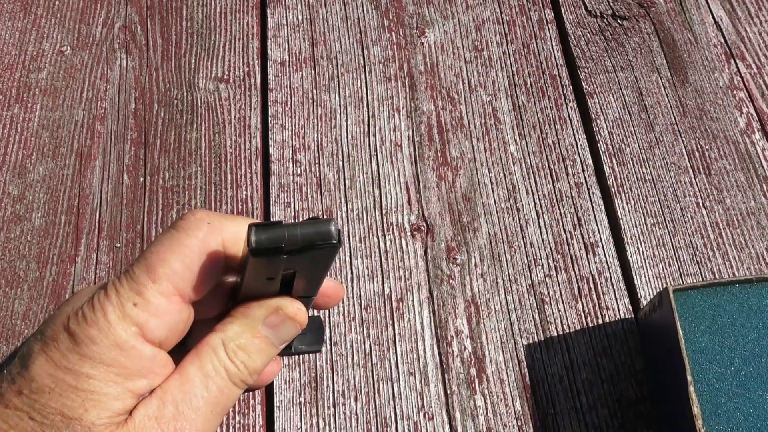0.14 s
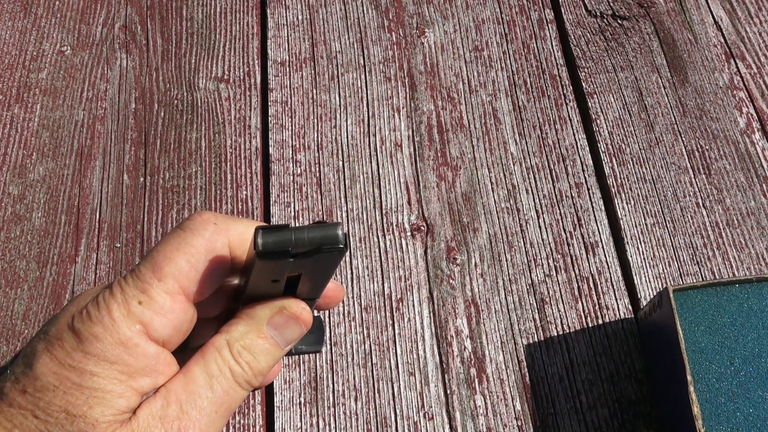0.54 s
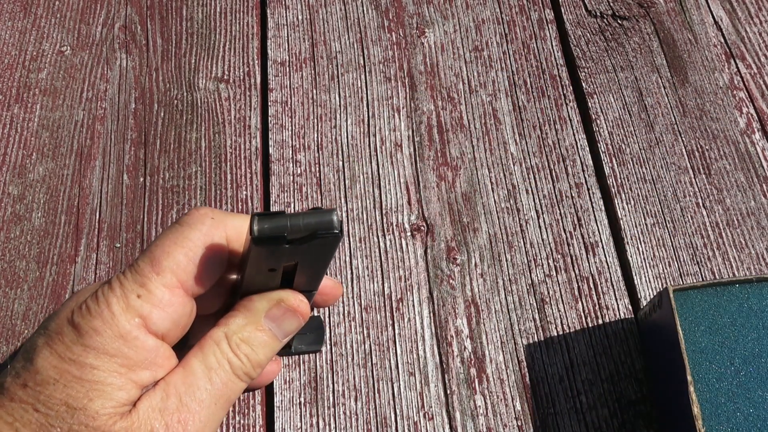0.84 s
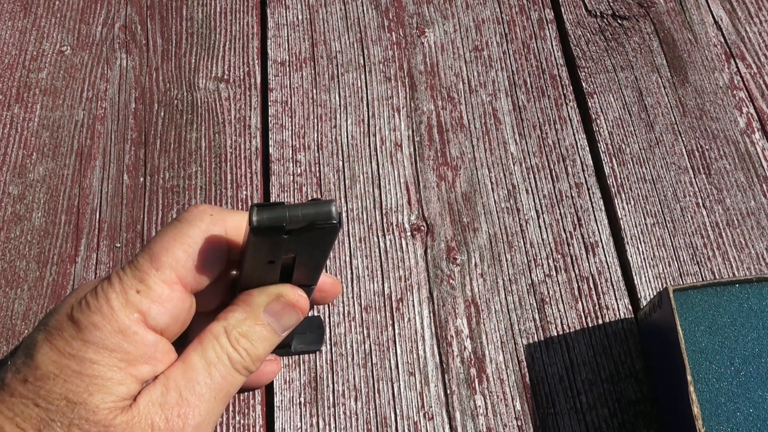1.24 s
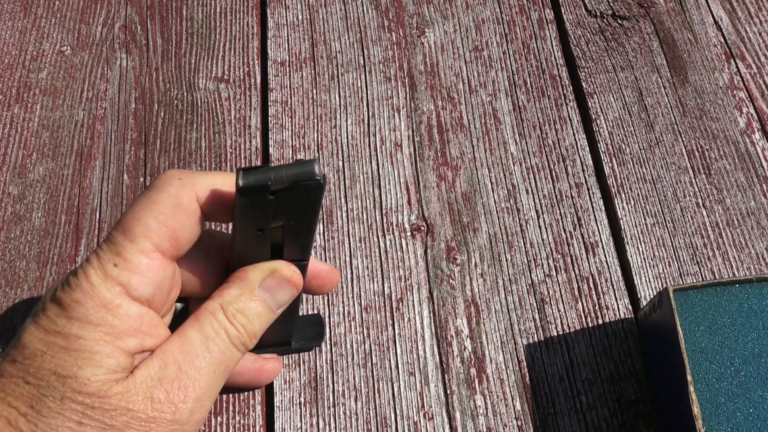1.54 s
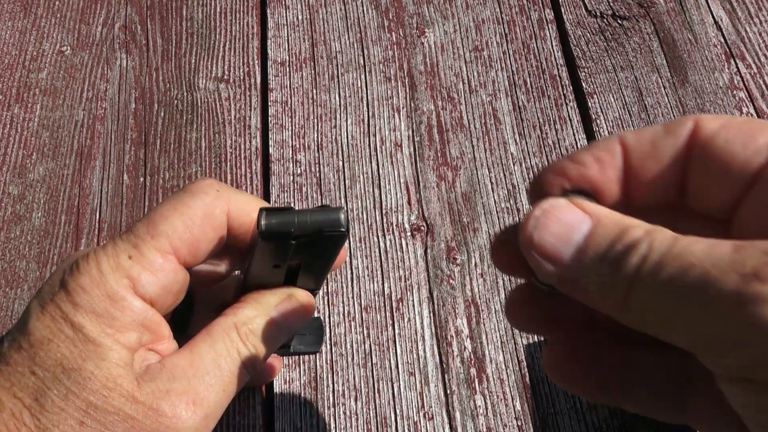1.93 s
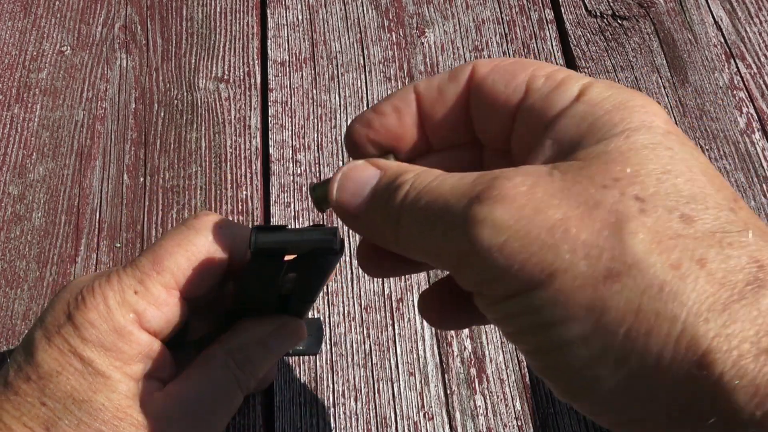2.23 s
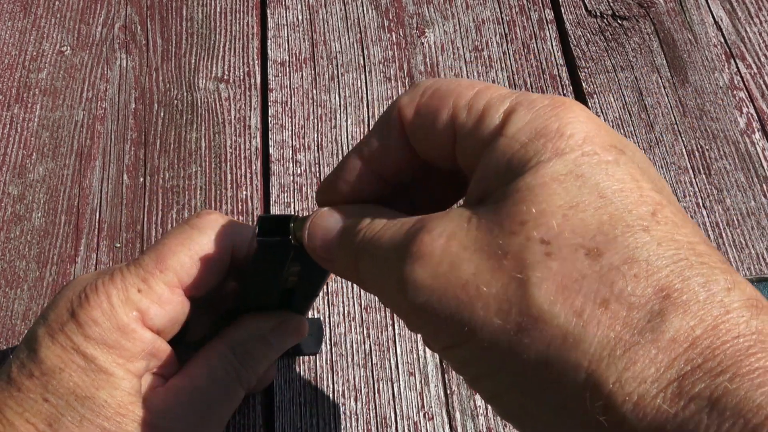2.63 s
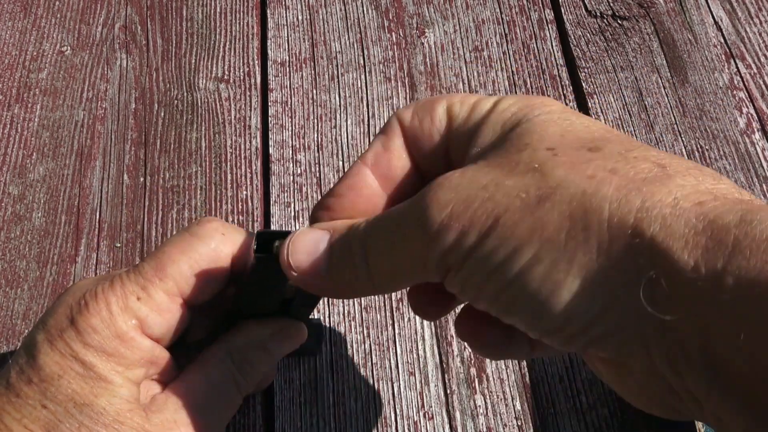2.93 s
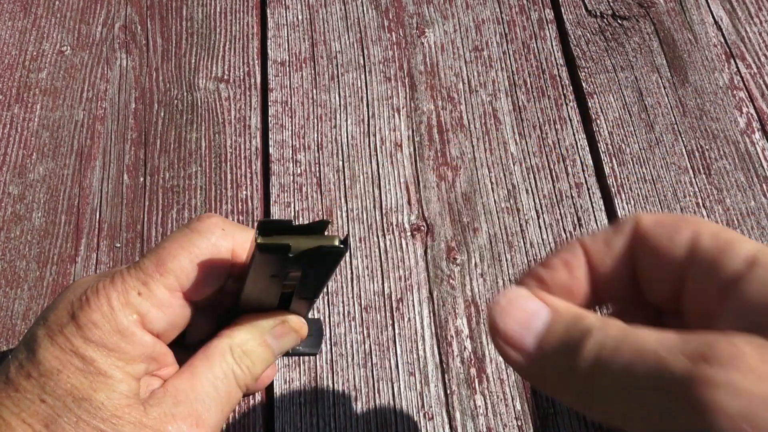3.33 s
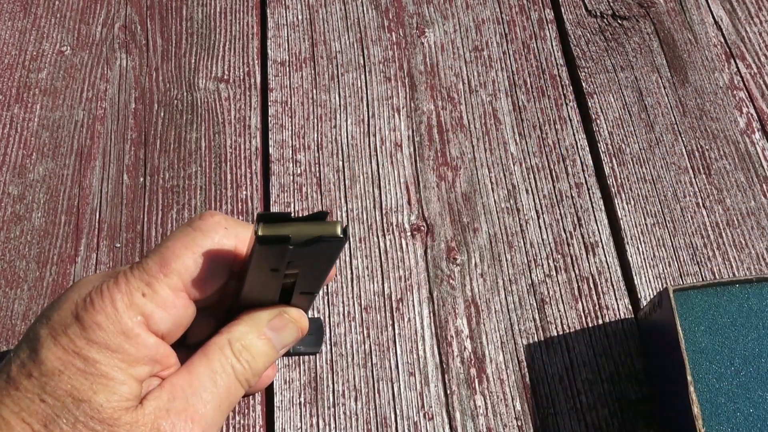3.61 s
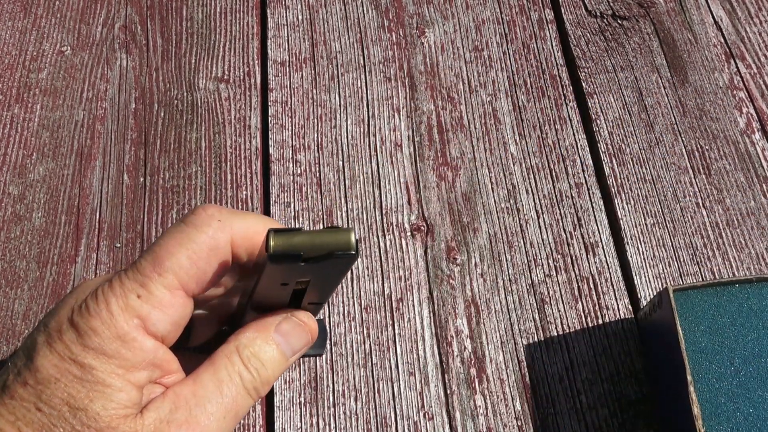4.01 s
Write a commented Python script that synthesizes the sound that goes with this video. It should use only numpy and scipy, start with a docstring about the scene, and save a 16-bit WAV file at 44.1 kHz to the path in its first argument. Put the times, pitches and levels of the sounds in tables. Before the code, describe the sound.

Near the microphone, loose rounds slide and thud in a small box on planks for about a second. Quiet follows, then tiny brass ticks, a dense burst of bright metal clicks and smaller clusters as the round is pressed home. A final snap precedes more box knocking. Steady hum, faint insects and slight low wind lie underneath; dry, open air.

```python
"""A hand rummages in a cartridge box on a plank bench outdoors, fingers a round, presses it under the steel
lips of a pistol magazine and reaches for the next. Sliding and knocking ring the box, the brass and the steel,
each built from a list of ringing pitches. The bench booms at each push as a low, nearly pure tone.
Behind it a motor hums in harmonics, insects sing in throbbing noise bands, and wind and air are shaped noise."""
import sys
import numpy as np
from scipy import signal
from scipy.fft import rfft, irfft
from scipy.io import wavfile
from scipy.ndimage import uniform_filter1d

SR = 44100
rng = np.random.default_rng(int(sys.argv[2]) if len(sys.argv) > 2 else 0)


def to_wav(s):
    """Save 16-bit WAV."""
    ch = np.atleast_2d(s).T  # columns
    pcm = np.round(np.clip(ch, -1, 1) * 32767)  # PCM
    wavfile.write(sys.argv[1], SR, pcm.astype(np.int16))


N = 183544  # length in samples


def amp(db):
    """Turn dB into gain."""
    return 10 ** (np.asarray(db) / 20)


def rms_one(x):
    """Scale to an rms level of 1."""
    return x / np.sqrt(np.mean(x ** 2) + 1e-20)


def in_time(rows):
    """Gain over time, along straight lines between points in dB."""
    s, db = np.transpose(rows)
    return amp(np.interp(np.arange(N) / SR, s, db))


def drift(rate):
    """Smooth random wandering of spread 1; a higher rate in Hz wanders faster."""
    r = np.exp(-80 * np.pi * rate / SR)  # made at every 40th sample
    noise = rng.standard_normal(N // 40 + 2002)
    slow = signal.lfilter([1], [1, -2 * r, r * r], noise)[2000:]  # skip the filter's start
    return np.interp(np.arange(N) / 40, np.arange(len(slow)), rms_one(slow))


def ring(x, hz, t60):
    """One resonance: a unit click sets a sine ringing, which falls 60 dB in t60 seconds."""
    r = amp(-60 / (t60 * SR))
    w = 2 * np.pi * hz / SR
    return signal.lfilter([0, np.sin(w)], [1, -2 * r * np.cos(w), r * r], x + 1e-18)


def grains(per_s, spread_db):
    """Rubbing as tiny slips at random moments, uneven in size and direction."""
    sizes = amp(spread_db * np.minimum(rng.exponential(1, N), 4))
    signs = rng.choice([-1, 1], N)
    return sizes * signs * (rng.random(N) < per_s / SR)


def rubbed(modes, tilt_db, pivot_hz, per_s, spread_db, patchy_db):
    """Random slips ring each mode of a body, with wandering loudness; the sum has rms 1."""
    out = 0
    for hz, db, t60 in modes:
        mode_db = db + tilt_db * np.log2(hz / pivot_hz) + patchy_db * drift(36)
        out = out + amp(mode_db) * ring(grains(per_s, spread_db), hz, t60)
    return rms_one(out)


def blow(hz, db, t60, centre_hz, focus_db, contact_s, luck):
    """A rough contact rings every mode; a positive focus favours those near the struck pitch."""
    t = np.arange(2000)[:, None] / SR
    uneven_db = 2.5 * luck[:len(hz)]
    gains = amp(db - focus_db * np.abs(np.log2(hz / centre_hz)) + uneven_db)
    modes = np.sum(gains * np.sin(2 * np.pi * hz * t) * amp(-60 * t / t60), axis=1)
    x = np.arange(len(luck) - 40) / (contact_s * SR)
    force = luck[40:] * np.sqrt(x + 0.0061) * np.exp(-x)  # noisy force builds, then lets go
    return np.convolve(force, modes)


def add(out, s, db, sound):
    """Lay one sound in at its time and peak level."""
    i = int(s * SR)
    out[i:i + len(sound)] += (amp(db) * sound / np.max(np.abs(sound)))[:N - i]


def strokes(rows, rise_db_per_s, fall_db_per_s):
    """Each row swells, holds and fades; gives that shape as gain, and the loudest row's other columns."""
    start_s, held_s, *columns = np.transpose(rows)
    t = np.arange(0, N + 40, 40) / SR
    early = np.maximum(start_s[:, None] - t, 0)
    late = np.maximum(t - (start_s + held_s)[:, None], 0)
    row_db = columns[0][:, None] - rise_db_per_s * early - fall_db_per_s * late
    lead = np.argmax(row_db, axis=0)
    level_db = np.max(row_db, axis=0)
    rest = [uniform_filter1d(c[lead], size=9) for c in columns]  # soften jumps between rows
    curves = [level_db - rest[0], *rest]
    shape_db, *rest = [np.interp(np.arange(N) / SR, t, c) for c in curves]
    return amp(shape_db), *rest


# How the box rings on the wood. Each row: pitch in Hz, relative level in dB, time to fall 60 dB in seconds.
BOX_MODES = [(278, -9.5, 0.04), (390, -3, 0.0073), (504.6, 1, 0.021), (624, -6, 0.021), (942, -3, 0.0091),
             (1168, -13, 0.015), (1466, -16.5, 0.0075), (1564, -13.5, 0.017), (1806, -5.5, 0.0081),
             (2350, -6.5, 0.0028), (2676, -5.5, 0.0092), (3120, -5.5, 0.0017), (3590, -9, 0.0042),
             (4270, -6, 0.0035), (5560, -16, 0.013), (7360, -16, 0.0072), (8860, -19, .005),
             (10300, -3, 0.0044)]
# The hand sweeps among the rounds in the box. Each row: start of the hold in seconds, hold in seconds,
# rms level in dB, brightness in dB per octave.
SWEEPS_IN_BOX = [(.474, 0.079, -39.5, 3), (.54, 0.016, -32, 0.2), (.62, 0.12, -48, -4.5),
                 (.726, 0.037, -29, 1.5), (.78, 0.033, -31, -1.5), (.851, 0.027, -23, -0.4),
                 (.884, .045, -23, 2.3), (.935, 0.046, -26, -0.9), (1.0, 0.056, -35, 0.5),
                 (1.105, 0.029, -25.5, 1.3), (1.16, .02, -35.5, -3), (1.2, 0.041, -45.5, -2),
                 (1.315, 0.04, -49.5, -4.5), (3.5, .2, -55.5, -7.5), (3.752, 0.0111, -36, -4),
                 (3.79, .03, -43.5, 1), (3.86, 0.076, -47.5, -0.5), (3.93, 0.061, -42.5, 0.5),
                 (4.02, .03, -47.5, -4), (4.054, 0.012, -23, 1), (4.086, 0.006, -27.5, -1)]
SWEEP_RISE_DB_PER_S, SWEEP_FALL_DB_PER_S = 3000, 256
# Dull knocks through box and planks. Each row: start in seconds, peak level in dB, favoured pitch in Hz,
# focus on that pitch in dB per octave.
BOX_KNOCKS = [(0.472, -28, 500, 25), (.478, -27, 894, 2), (0.5, -29.5, 845, 13), (0.551, -27.5, 1040, 5),
              (0.699, -33, 1070, 6), (.733, -13.5, 1560, 8.5), (0.756, -16.5, 1544, 5.5),
              (0.791, -15.5, 969, -2), (.812, -30, 1090, 19), (.851, -37, 1817, 2.5), (.869, -41, 1350, 8),
              (.884, -14.5, 1220, 3.5), (.904, -21.5, 802, 16), (.924, -25, 916, 25),
              (.951, -11.5, 802, -2.5), (.977, -17.5, 1700, 8.5), (1.006, -29.5, 1760, 10),
              (1.034, -26, 1692, 11), (1.105, -25, 1760, 0.5), (1.121, -14.5, 800, 3),
              (1.142, -23, 1728, 11), (1.164, -20.5, 1790, 12), (1.186, -29, 810, -2),
              (1.199, -38, 1030, 9), (1.215, -28, 832, 1), (1.243, -36, 805, 0), (1.31, -30, 1831, -1.5),
              (1.35, -39, 1800, 4), (2.638, -37, 516, 14), (2.911, -21.5, 1483, 32), (2.987, -30, 2000, 2),
              (3.186, -36.5, 902, 4), (3.751, -30, 700, 3), (3.792, -36.5, 1003, 4), (3.962, -39, 1940, -2),
              (4.054, -18, 1074, 20), (4.065, -14.5, 2407, 31), (4.089, -10, 970, 9),
              (4.102, -17.5, 1450, 10), (4.136, -40, 2600, -6)]
KNOCK_CONTACT_S = 0.0026  # time scale of the letting go


def box():
    """Rounds sliding and knocking in the box ring its walls."""
    shape, level_db, tilt_db = strokes(SWEEPS_IN_BOX, SWEEP_RISE_DB_PER_S, SWEEP_FALL_DB_PER_S)
    sliding = rubbed(BOX_MODES, tilt_db, 1120, per_s=2000, spread_db=4.5, patchy_db=3.5)
    out = shape * amp(level_db) * sliding
    hz, db, t60 = np.transpose(BOX_MODES)
    lucks = rng.standard_normal((len(BOX_KNOCKS), 1200))
    for (s, peak_db, centre_hz, focus_db), luck in zip(BOX_KNOCKS, lucks):
        add(out, s, peak_db, blow(hz, db, t60, centre_hz, focus_db, KNOCK_CONTACT_S, luck))
    return out


# How the brass case rings. Each row: pitch in Hz, relative level in dB, time to fall 60 dB in seconds.
CASE_MODES = [(2010, -10.5, 0.016), (2860, -5, 0.018), (3334, 1.5, 0.02), (3770, -1, 0.024),
              (4446, -5, 0.015), (5400, -6, 0.02), (6540, -7, 0.019), (7030, 0, 0.026), (7800, 1.5, 0.0042),
              (8560, -4.5, 0.026), (9770, -0.5, 0.013)]
# How the magazine's hollow body rings. Each row: pitch in Hz, relative level in dB, time to fall 60 dB in seconds.
HOLLOW_MODES = [(382, 3.5, 0.047), (504, 3.5, 0.014), (634, -0.5, 0.039), (847, -4.5, 0.071),
                (987, -7.5, 0.034)]
# A round turned between the fingers. Each row: start of the hold in seconds, hold in seconds, case rms level in dB,
# case brightness in dB per octave, hollow body rms level in dB, spring rms level in dB.
FINGER_TURNS = [(1.888, .012, -49.5, -5, -52.5, -53.5), (1.96, .03, -49.5, -2, -55, -49),
                (1.995, 0.061, -41.5, 0, -44.5, -48.5), (2.075, 0.01, -46.5, -1, -46, -47),
                (2.11, 0.024, -47.5, -2, -47, -43), (2.138, 0.0069, -35.5, 5.5, -44, -33),
                (2.155, 0.047, -40, 1, -44.5, -35.5), (2.232, 0.03, -39, 3, -46.5, -38.5),
                (2.28, 0.032, -52, -7, -50, -47), (2.32, 0.052, -59, -0.5, -59, -52)]
TURN_RISE_DB_PER_S, TURN_FALL_DB_PER_S = 900, 398
SPRING_HZ, SPRING_T60_S = 474, 0.16


def fingers():
    """The case rings faintly as it rolls; the grip rubs the hollow magazine and sets its spring humming."""
    turns = strokes(FINGER_TURNS, TURN_RISE_DB_PER_S, TURN_FALL_DB_PER_S)
    shape, case_db, tilt_db, body_db, spring_db = turns
    case = rubbed(CASE_MODES, tilt_db, 4400, per_s=7600, spread_db=1.0, patchy_db=5.0)
    body = rubbed(HOLLOW_MODES, 0, 500, per_s=1400, spread_db=1.5, patchy_db=-1.5)
    spring = rms_one(ring(rng.standard_normal(N), SPRING_HZ, SPRING_T60_S))
    return shape * (amp(case_db) * case + amp(body_db) * body + amp(spring_db) * spring)


TAIL_DB, TAIL_T60_S = -7, 0.028


def scattered(x):
    """Scatter off hands and planks gives each click a brief, noisy tail."""
    tail = rng.standard_normal(3000) * amp(-60 * np.arange(3000) / SR / TAIL_T60_S)
    tail = tail / np.linalg.norm(tail)
    return x + amp(TAIL_DB) * signal.fftconvolve(x, tail)[:N]


# How the hand-damped steel rings. Each row: pitch in Hz, relative level in dB.
STEEL_MODES = [(1710, -47), (2150, -13.5), (2780, -21), (3350, -35), (3910, -4.5), (4410, 9), (4940, 11.5),
               (5400, 11), (5820, 3.5), (6380, 11), (7240, 12.5), (7700, 9), (8200, 9.5), (8800, -21),
               (9340, -6.5), (9900, 28.5)]
# Brass sliding under the lips. Each row: start of the hold in seconds, hold in seconds, metal rms level in dB
# (before bass cut and scatter), metal brightness in dB per octave, wooden body rms level in dB.
LIP_SLIDES = [(2.372, 0.017, -50, -3, -41), (2.395, 0.03, -41.5, 3, -27), (2.425, 0.009, -44.5, 2, -34.5),
              (2.445, 0.0045, -42, 2, -29.5), (2.455, 0.035, -38.5, -17, -41.5),
              (2.697, 0.009, -31.5, -15.5, -39.5), (2.897, .01, -46, -7.5, -48),
              (2.911, 0.012, -30.5, -16, -34.5), (2.945, .035, -51, -5, -54),
              (2.989, 0.018, -40, -3, -33.5), (3.02, 0.011, -38, -11.5, -31.5),
              (3.045, 0.019, -49, -6.5, -44.5), (3.18, 0.019, -52.5, -22, -51),
              (3.27, 0.02074, -57, -15, -70), (3.472, .008, -59, -4, -65), (3.565, 0.032, -49, 2, -64),
              (3.635, .015, -44, -4.5, -48.5), (3.652, 0.011, -42.5, -8, -41.5),
              (3.682, .015, -56, 0.5, -55)]
SLIDE_RISE_DB_PER_S, SLIDE_FALL_DB_PER_S = 4004, 446
# Brass clicking on steel. Each row: start in seconds, peak level in dB (before bass cut and scatter),
# favoured pitch in Hz, focus on that pitch in dB per octave.
STEEL_CLICKS = [(1.873, -40, 3440, 21), (1.889, -28, 3660, 10), (1.9962, -30, 3660, 1),
                (2.0057, -30, 3710, 8), (2.0344, -19, 6760, 28), (2.073, -32, 3650, 15),
                (2.1099, -23.5, 6750, -1), (2.1208, -40, 3250, 16), (2.137, -19.5, 7200, 27),
                (2.1987, -23, 7970, 13), (2.211, -30, 3250, 1), (2.2316, -14.5, 9860, 9),
                (2.2508, -18, 8020, 12), (2.2814, -27, 4690, 21), (2.3018, -20, 4040, 29),
                (2.3884, -17, 4400, 17), (2.3964, -3.5, 5830, 25), (2.401, -9, 8170, -5),
                (2.4057, -16, 5850, 9), (2.408, -9, 7500, 21), (2.412, -3.5, 6340, 27),
                (2.4188, -15.5, 4400, 19), (2.4263, -8, 4470, 8), (2.4337, -13, 4120, 18),
                (2.4453, 0, 5260, 10), (2.4597, -23, 5020, 15), (2.471, -19, 4990, 1),
                (2.5428, -31.5, 4270, 17), (2.6335, -39, 4170, 18), (2.676, -33, 4574, 16),
                (2.6986, -11.5, 7100, 30), (2.7122, -23.5, 4476, 18), (2.7582, -35.5, 7240, 33),
                (2.794, -33, 4670, 24), (2.8962, -18.5, 6470, 38), (2.9092, -22.5, 6430, 25),
                (2.918, -16, 6490, 25), (2.9284, -12.5, 6600, 22), (2.9314, -17, 5500, 15),
                (2.966, -27, 4040, 17), (2.9786, -29, 4220, 20), (2.9891, -8, 4230, 2),
                (2.993, -7, 9260, 5), (2.996, -11, 9300, 15), (2.9987, -25, 5500, 16),
                (3.0091, -18, 9590, 7), (3.0131, -17, 4710, 15), (3.0173, -15, 4030, 9),
                (3.0281, -18, 4260, 24), (3.0457, -25.5, 4070, 19), (3.0613, -31, 4900, 19),
                (3.115, -37.5, 4240, 13), (3.222, -34.5, 4227, 17), (3.475, -28, 7390, 6),
                (3.5662, -24.5, 7590, 31), (3.5972, -35.5, 4540, 16), (3.6359, -18.5, 9620, 18),
                (3.6445, -18, 9520, 18), (3.65, -32, 4120, -3), (3.656, -14.5, 5574, 11),
                (3.6616, -2.5, 8550, 48), (3.688, -30, 4950, 22)]
CLICK_T60_S, CLICK_CONTACT_S = 0.006, 0.00083
# Touches that leave a loosely held magazine wall ringing. Each row: start in seconds,
# peak level in dB (before bass cut and scatter).
WALL_PINGS = [(1.8921, -60), (2.0368, -45), (2.2824, -45), (2.9886, -36), (3.1914, -56), (3.2271, -58),
              (3.2714, -58.5), (3.4755, -57), (3.5658, -58)]
WALL_HZ, WALL_T60_S = 2066, 0.092
# A round dropped on the lips chatters to rest: first tap, first gap, share of the gap kept each time.
BOUNCE_S, BOUNCE_GAP_S, BOUNCE_KEEP = 2.3708, 0.0033, 0.74
BOUNCE_DB, BOUNCE_LOSS_DB = -4.5, 3  # first peak before bass cut and scatter, loss per tap


def magazine():
    """Brass slides, clicks and bounces on the steel lips, and pushes travel down into the wood."""
    slides = strokes(LIP_SLIDES, SLIDE_RISE_DB_PER_S, SLIDE_FALL_DB_PER_S)
    shape, level_db, tilt_db, body_db = slides
    lips = [(hz, db, 0.008) for hz, db in STEEL_MODES]
    sliding = rubbed(lips, tilt_db, 4500, per_s=1200, spread_db=3.0, patchy_db=3.5)
    metal = shape * amp(level_db) * sliding
    hz, db = np.transpose(STEEL_MODES)
    lucks = rng.standard_normal((len(STEEL_CLICKS), 500))
    for (s, peak_db, centre_hz, focus_db), luck in zip(STEEL_CLICKS, lucks):
        add(metal, s, peak_db, blow(hz, db, CLICK_T60_S, centre_hz, focus_db, CLICK_CONTACT_S, luck))

    s = BOUNCE_S
    tick = np.diff(np.hanning(6) ** 2)
    for k in range(9):  # each bounce keeps the same share of speed: gaps close up as taps fade
        add(metal, s, BOUNCE_DB - k * BOUNCE_LOSS_DB, tick)
        s += BOUNCE_GAP_S * BOUNCE_KEEP ** k

    touch = np.r_[np.hanning(12), np.zeros(4000)]
    for s, peak_db in WALL_PINGS:
        add(metal, s, peak_db, ring(touch, WALL_HZ, WALL_T60_S))

    bass_cut = signal.butter(4, 1900, "high", fs=SR, output="sos")  # small parts radiate little bass
    metal = scattered(signal.sosfilt(bass_cut, metal))
    wood_modes = [(hz, db, t60) for hz, db, t60 in BOX_MODES if hz < 2000]
    wood = rubbed(wood_modes, 0.55, 700, per_s=650, spread_db=2.5, patchy_db=1.5)
    return metal + shape * amp(body_db) * wood


# Pushes that set the planks swinging. Each row: start of full swing in seconds, hold in seconds,
# rms level in dB, pitch in Hz.
BENCH_PUSHES = [(.515, 0.026, -21.5, 88), (.59, 0.012, -31, 81.8), (.66, 0.017, -31, 80.5),
                (.715, 0.012, -25, 81.8), (.762, 0.03, -11.5, 85.1), (.88, 0.06, -28, 91.5),
                (.955, 0.036, -18, 87.8), (1.135, 0.037, -24.5, 87.75), (1.235, 0.023, -28.5, 87.7),
                (1.342, 0.017, -32, 87), (2.09, .19, -35.5, 85.5), (2.43, .012, -30, 90.2),
                (2.57, 0.019, -31.5, 83.5), (2.735, 0.035, -31, 81.5), (2.96, 0.022, -29.5, 81.16),
                (3.055, 0.011, -24, 85.33), (3.16, 0.067, -38, 78.8), (3.712, 0.04, -23, 84.7),
                (3.79, 0.0402, -31, 89), (3.88, .02, -38, 91.3), (3.975, .07, -40.5, 88.6),
                (4.11, 0.034, -17.5, 83.8)]
SWING_RISE_DB_PER_S, SWING_FALL_DB_PER_S = 601, 318.5


def bench():
    """The lowest plank mode booms, nearly a sine."""
    shape, db, hz = strokes(BENCH_PUSHES, SWING_RISE_DB_PER_S, SWING_FALL_DB_PER_S)
    phase = 2 * np.pi * np.cumsum(hz) / SR
    return np.sqrt(2) * shape * amp(db) * np.sin(phase)


# Motor harmonics. Each row: multiple of the firing rate, middle rms level in dB.
MOTOR_HARMONICS = [(2, -41), (3, -50), (4, -44.5), (4.5, -55.5), (6, -50.5), (8, -56), (10, -84.5),
                   (14, -76.5), (19.33, -73.5)]
FIRING_HZ = 41.18  # middle of a slight wander


def motor():
    """Firing harmonics hum on a slightly wandering speed, each wandering in level."""
    phase = 2 * np.pi * np.cumsum(FIRING_HZ * (1 + 0.0015 * drift(1.0))) / SR
    out = 0
    for multiple, db in MOTOR_HARMONICS:
        level = np.sqrt(2) * amp(db + 1.92 * drift(9.1))
        out = out + level * np.sin(multiple * phase + rng.uniform(0, 8.15))
    return out


# Insect choruses. Each row: pitch in Hz, width in Hz of each of two filters, middle level in dB before throbbing,
# middle rate in throbs per second, throb depth from 0 to 1.
INSECT_CHORUSES = [(4125, 254, -60.5, 48, 0.11), (4526, 256, -60, 47, 0), (7630, 140, -73, 9.1, 0.98),
                   (7346, 730, -59.5, 39, 0.3), (8730, 210, -71, 16, 0.4), (10180, 87, -47.5, 67, 0.6)]


def insects():
    """Many singers blur into narrow noise bands that throb at the wing rate."""
    out = 0
    for hz, width_hz, db, rate, depth in INSECT_CHORUSES:
        band = rng.standard_normal(N)
        for _ in range(2):
            band = ring(band, hz, np.log(1000) / (np.pi * width_hz))
        throb_phase = 2 * np.pi * np.cumsum(rate * (1 + 0.024 * drift(1.03))) / SR
        throb = 1 + depth * np.sin(throb_phase)
        out = out + amp(db + drift(1.0)) * throb * rms_one(band)
    return out


# Breeze on the microphone. Each row: time in seconds, rms level in dB.
BREEZE = [(0.0, -58), (0.22, -62), (0.28, -49), (0.31, -48), (1.08, -60), (1.17, -64), (2.28, -63.5),
          (3.12, -39.5), (3.39, -70.5), (3.49, -53), (3.66, -57), (3.72, -37), (4.01, -50), (4.16, -36)]


def wind():
    """The breeze is a lumpy rumble of low noise below the hum."""
    low_band = signal.butter(3, [24, 52], "band", fs=SR, output="sos")
    rumble = signal.sosfilt(low_band, rng.standard_normal(N))
    return in_time(BREEZE) * rms_one(rumble)


# Colour of the open-air background. Each row: pitch in Hz, relative level per Hz in dB.
AIR_COLOUR = [(32, -33.5), (55, -14.5), (85, 4), (171, -19.5), (209, -25), (248, -14.5), (337, -20),
              (385, -25.5), (809, -33.5), (922, -43), (3570, -50.5), (4350, -26.5), (6040, -61.5),
              (7350, -24), (10200, -48), (13300, -78.5), (22000, -120)]
AIR_DB = -45.5  # middle rms level


def air():
    """Open air is coloured noise, steady but for a slight drift in level."""
    hz = np.maximum(np.fft.rfftfreq(N, 1 / SR), 1)
    point_hz, point_db = np.transpose(AIR_COLOUR)
    colour = amp(np.interp(np.log(hz), np.log(point_hz), point_db))
    noise = irfft(rfft(rng.standard_normal(N)) * colour, N)
    return amp(AIR_DB + drift(0.93)) * rms_one(noise)


def scene():
    """All sounds add up at one microphone."""
    nearby = box() + fingers() + magazine() + bench()
    background = motor() + insects() + wind() + air()
    return (nearby + background)[None]


def record(dry):
    """A steep filter cuts the top: 60 dB down from 10350 Hz upward."""
    return signal.sosfilt(signal.cheby2(16, 60, 10350, fs=SR, output="sos"), dry)


dry = scene()
out = record(dry)
to_wav(out)
```